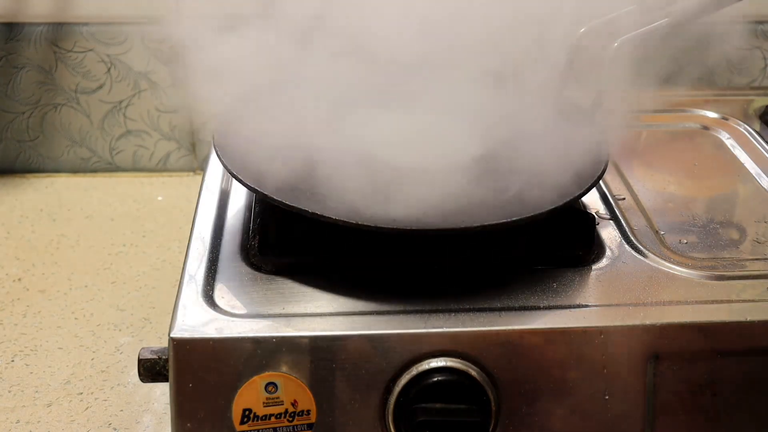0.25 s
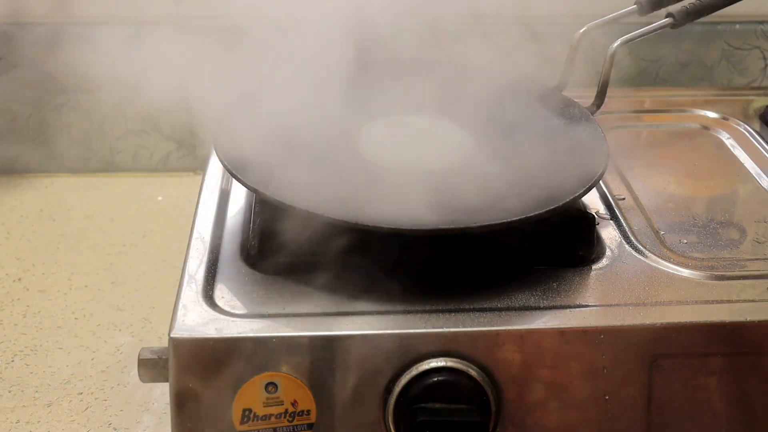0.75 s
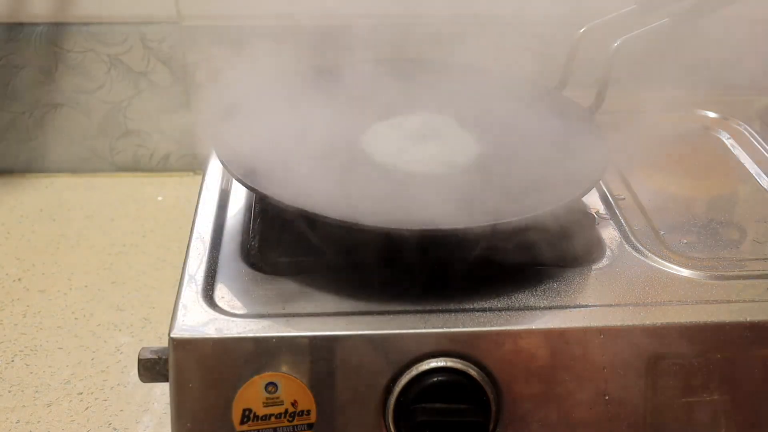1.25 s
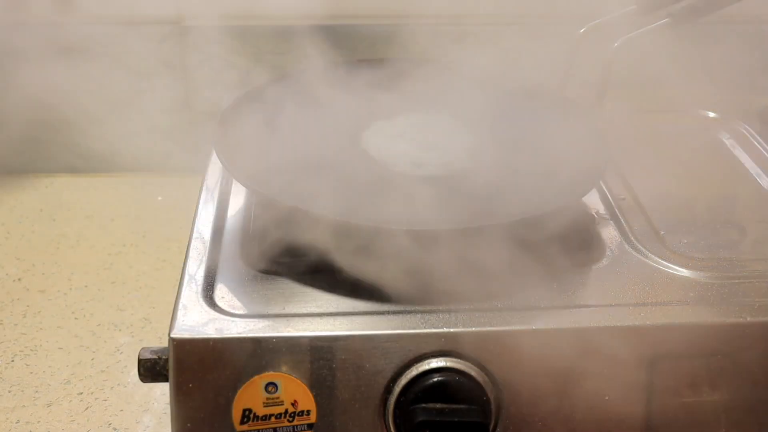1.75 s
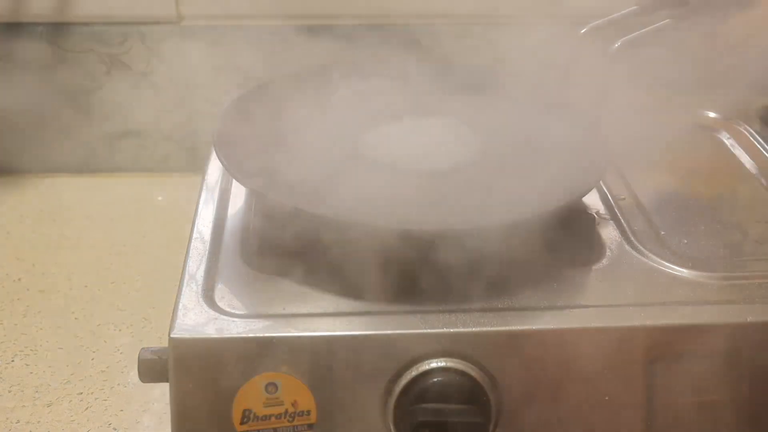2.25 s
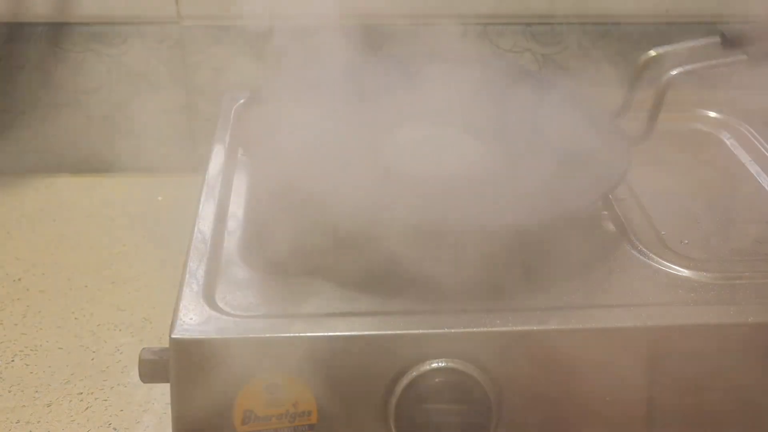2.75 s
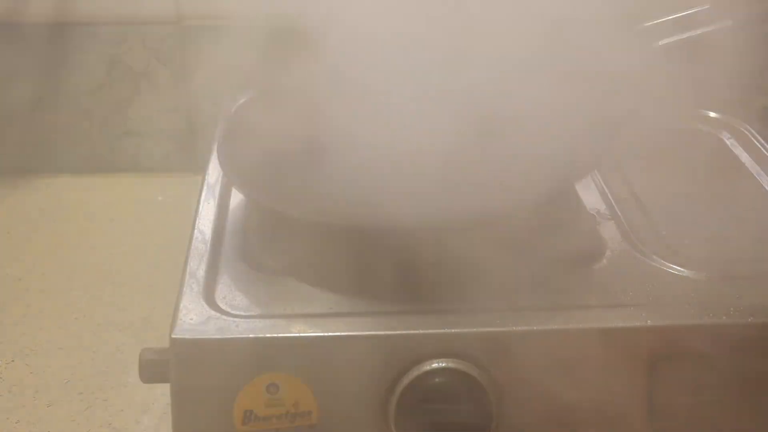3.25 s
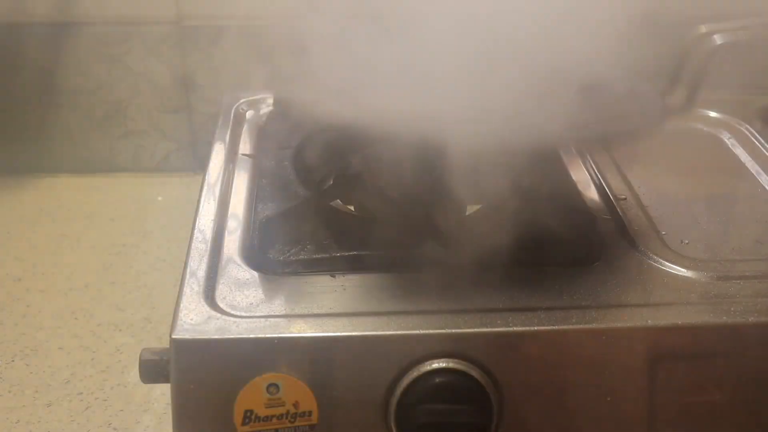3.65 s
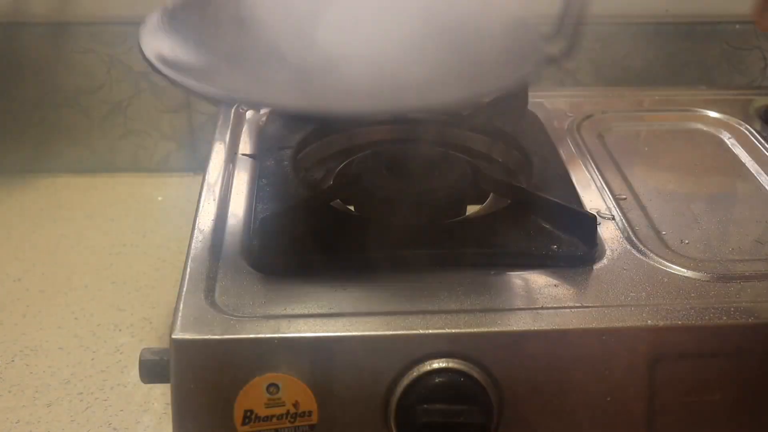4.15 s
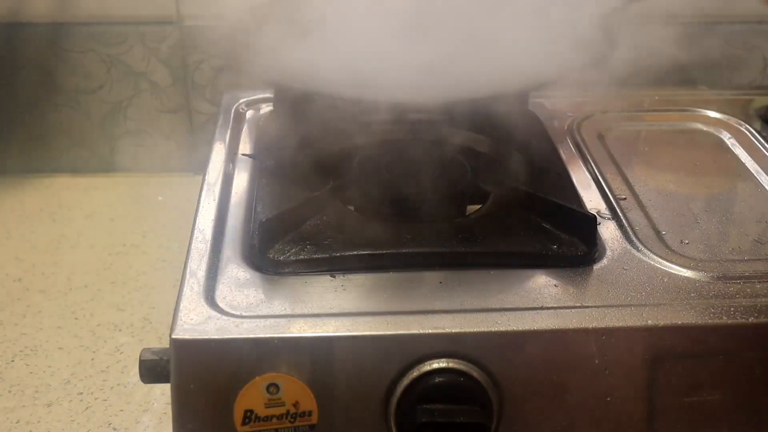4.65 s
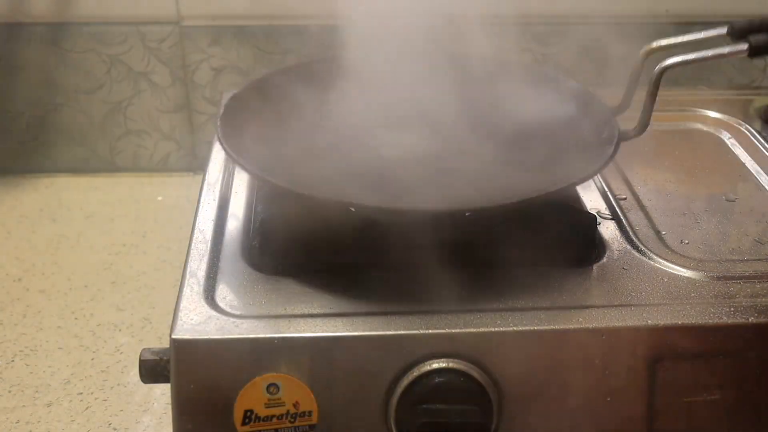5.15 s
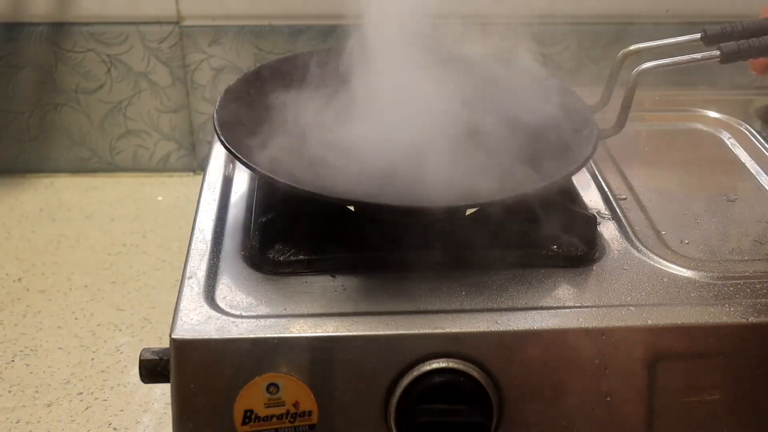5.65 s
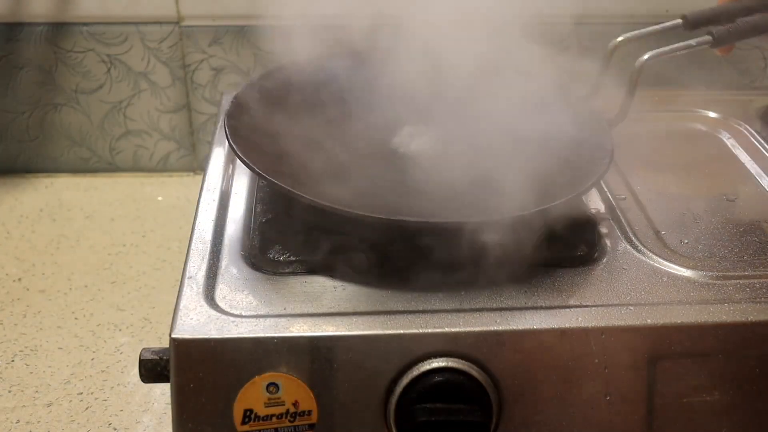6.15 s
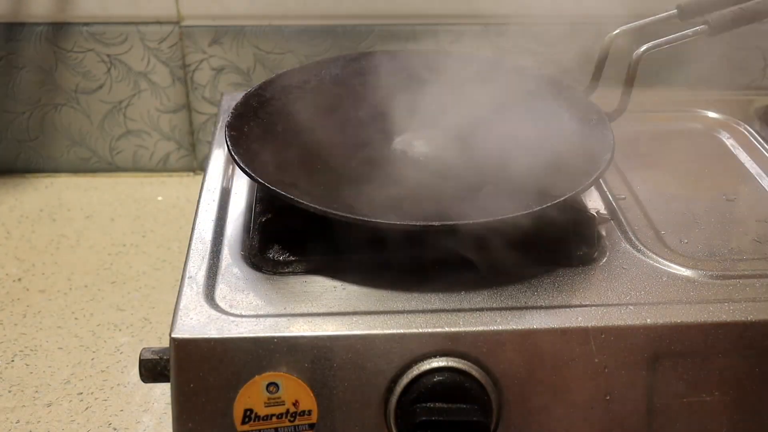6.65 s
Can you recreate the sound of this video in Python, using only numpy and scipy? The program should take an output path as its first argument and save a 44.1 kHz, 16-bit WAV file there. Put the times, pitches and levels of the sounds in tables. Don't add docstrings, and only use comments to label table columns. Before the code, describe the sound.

A strong sizzle is already under way: wide, treble-rich steam hiss, slightly stronger on the left, dusted with tiny bubble ticks. Loud bassless snaps spit from all over the hot plate, singly at first, then in thick volleys at about three and a half and five seconds as water runs over fresh hot iron. Afterwards the hiss drops and isolated crackles continue. Close stereo microphone, small tiled kitchen, short reflections.

```python
import sys
import numpy as np
from scipy import signal
from scipy.fft import rfft, irfft, next_fast_len
from scipy.io import wavfile
from scipy.ndimage import uniform_filter1d

SR = 44100
rng = np.random.default_rng(int(sys.argv[2]) if len(sys.argv) > 2 else 0)


def materialize(psi):
    bounded = np.clip(np.atleast_2d(psi).T, -1, 1)
    quanta = np.round(bounded * 32767).astype(np.int16)
    wavfile.write(sys.argv[1], SR, quanta)


def convert_level_to_amplitude(level_db):
    exponent = np.asarray(level_db, float) / 20
    return 10 ** exponent


N = 304290


def evened(x):
    return x / np.sqrt(np.mean(x ** 2) + 1e-20)


def read(points, hz):
    f, value = np.transpose(points)
    return np.interp(np.log(hz + 1), np.log(f + 1), value)


# t/s, steam hiss level/dB, small sputter level/dB, puddle position L-R level/dB
BOIL = [(0.0, -26, -33.5, -4.5), (0.25, -28, -35, -4.5), (0.45, -29, -40.5, -5.5), (1.2, -29.5, -36, -4),
        (1.55, -30, -40, -4.5), (2.05, -27.5, -41.5, -5.5), (2.42, -27.5, -41, -5), (2.75, -27, -40, -6),
        (3.33, -28.5, -44, -6), (3.55, -24.5, -34, -3), (4.08, -29.5, -45, -6), (4.35, -23.5, -37, -3),
        (4.75, -29.5, -40, -4.5), (5.15, -25.5, -33.5, -3.5), (5.5, -29.5, -34.5, -2),
        (5.8, -32, -38.5, -6), (6.3, -32, -40, -6), (6.9, -32, -38.5, -4)]


def boil(t, axis):
    curve = np.array(BOIL)
    return np.interp(t, curve[:, 0], curve[:, axis])


# f/Hz, density level/dB per Hz
HISS = [(60, -46), (150, -38), (400, -14), (1000, -6.5), (2000, -4.5), (3400, -2), (6000, -2.5),
        (10200, -2.5), (11900, 0), (13800, 1.5), (15600, -2.5)]
# f/Hz, L-R level/dB
LEAN = [(60, -2), (380, 4.5), (2380, 0), (15000, -6)]
# f/Hz, left-right coherence/1
SAME = [(60, 1), (1000, 0.44), (15000, 0.063)]


def steam(patchy_db=0.5, flicker_db=0.54, knee_hz=6000, lean_db=-4.0, lower_per_sputter=0.098):
    frames, hz = N // 64 + 5, np.fft.rfftfreq(256, 1 / SR)
    t = np.arange(frames) * 64 / SR
    a, b, c, d, patches = rng.standard_normal((frames, 129, 5)).T

    patches = uniform_filter1d(patches, size=12, axis=0)
    patches = evened(uniform_filter1d(patches, size=40, axis=1))
    flicker = evened(uniform_filter1d(rng.standard_normal(frames), size=14))

    same = np.clip(read(SAME, hz), -1, 1)[:, None]
    left = a + 1j * b
    right = same * left + np.sqrt(1 - same ** 2) * (c + 1j * d)
    z = np.array([left, right])

    sputter_db = boil(t, axis=2)
    low_band = 1 / (1 + (hz[:, None] / knee_hz) ** 4)
    lower_db = lower_per_sputter * (sputter_db - sputter_db.mean()) * low_band
    side_db = read(LEAN, hz)[:, None] + boil(t, axis=3) - lean_db
    z *= convert_level_to_amplitude(boil(t, axis=1) + lower_db + patchy_db * patches + flicker_db * flicker)
    z *= convert_level_to_amplitude(np.array([side_db, -side_db]) / 2)
    hiss = signal.istft(z, nperseg=256, noverlap=192)[1][:, :N]

    size = 2 * next_fast_len(N // 2 + 1)
    colour = convert_level_to_amplitude(read(HISS, np.fft.rfftfreq(size, 1 / SR)))
    return convert_level_to_amplitude(-12.5) * irfft(rfft(hiss, size) * colour)[:, :N]


def fizz(per_s=1200, level_db=-6.5):
    place, pitch, size = rng.random((int(per_s * N / SR) * 2, 3)).T
    t = np.arange(60) / SR
    hz = 3000 + 12000 * pitch[:, None]
    size_db = -4.0 * np.maximum(np.log(size), -5.0)
    rings = convert_level_to_amplitude(size_db)[:, None] * np.sin(2 * np.pi * hz * t) * np.exp(-t * hz / 2.0)
    at = (place * (2 * N - 60)).astype(int)[:, None] + np.arange(60)
    out = np.bincount(at.ravel(), rings.ravel(), minlength=2 * N).reshape(2, N)
    out = signal.lfilter(*signal.butter(3, 1500 / (SR / 2), "high"), out)
    s = np.arange(N) / SR
    side_db = np.outer([.5, -.5], boil(s, axis=3))
    return evened(out) * convert_level_to_amplitude(level_db + boil(s, axis=1) + side_db)


def bursts(s, db, side_db, width_ms, recoil=0.14, lag=8e-5, tick=0.62, bend_hz=140,
           large_db=-10, rise_share=.6):
    collapse_chance = np.where(db > large_db, .9, .65)
    sign = np.where(rng.random(len(s)) < collapse_chance, -1., 1.)
    direct, bent = np.zeros((2, N + 120)), np.zeros((2, N + 120))
    reach = np.arange(-50, 70)
    for port, away_db in enumerate([np.maximum(-side_db, 0), np.maximum(side_db, 0)]):
        shaded = np.tanh(away_db / 3.7)[:, None]
        at = (s[:, None] + lag * shaded) * SR
        place = np.clip(at.astype(int), 50, N) + reach
        ms = (place - at) / SR * 1000
        u = ms / width_ms[:, None] / np.where(ms < 0, rise_share, 1.2)
        snap = tick * np.sqrt(10 * width_ms)[:, None]
        spike = (1 - recoil * u ** 2) * np.exp(-u ** 2 / 2) + snap * np.exp(-(ms / 0.041) ** 2)
        spike *= (sign * convert_level_to_amplitude(db - away_db))[:, None]
        straight = spike * (1 - 0.55 * shaded)
        direct[port] = np.bincount(place.ravel(), straight.ravel(), minlength=N + 120)
        bent[port] = np.bincount(place.ravel(), (spike * shaded).ravel(), minlength=N + 120)
    round_housing = signal.lfilter(*signal.butter(1, bend_hz / (SR / 2)), bent)
    return (direct + 2.6 * round_housing)[:, :N]


def sputter(quiet_db=-42.5, loud_db=-30.0, per_s=420, spread_db=6, clump_db=2.2, clumps_per_s=14):
    when, size, rim, place, wide = rng.random((int(per_s * N / SR), 5)).T
    s = when * N / SR
    depth = np.clip((boil(s, axis=2) - quiet_db) / (loud_db - quiet_db), 0, 1)
    knots = rng.standard_normal(200)
    clump = clump_db * np.interp(s * clumps_per_s, np.arange(200), knots)
    db = clump + boil(s, axis=2) + 9.0 - spread_db * np.maximum(np.log(size), -2.5)
    side_db = np.sign(rim - .5) * (3.2 + 9.4 * place)
    width_ms = 0.033 + (0.05 + 0.23 * depth) * wide
    return bursts(s, db, side_db, width_ms, recoil=(.95 - 0.68 * depth)[:, None])


# start t/s, length t/s, rate/(pops per s), peak level/dB, width t/ms
VOLLEYS = [(0.032, 0.098, 60, -14, 0.11), (0.175, 0.02, 77, -10, 0.12), (0.236, 0.075, 110, -8, 0.12),
           (1.029, 0.12, 30.7, -14.5, 0.11), (1.15, 0.15, 70, -11, 0.09), (1.345, 0.085, 60, -10, 0.084),
           (0.385, 0.07, 40, -18, 0.09), (4.658, 0.025, 120, -8.5, 0.053), (4.865, 0.04, 40, -13, 0.093),
           (3.41, 0.08, 50, -7, 0.15), (3.508, 0.036, 260, -6, 0.19), (3.57, 0.035, 132, -6, 0.12),
           (3.621, 0.11, 44, -14, 0.12), (4.29, 0.16, 45, -13, 0.1), (4.922, 0.03, 138, -6.5, 0.12),
           (5.066, 0.06, 150, -7, 0.12), (5.148, 0.07, 110, -5.5, 0.11), (5.239, 0.065, 157, -3.5, 0.09),
           (5.358, 0.075, 62, -7.5, 0.088), (5.467, 0.06, 90, -7.5, 0.099), (5.56, 0.06, 92, -8, 0.11),
           (6.209, 0.19, 60, -13, 0.081), (6.52, 0.22, 40, -12, 0.072)]


def volleys(count=60, even=.35, spread_db=7, rim_db=0.5, rim_spread_db=17, width_spread=1):
    rows = []
    for start, length, per_s, db, width_ms in VOLLEYS:
        gap, size, rim, place, wide = rng.random((count, 5)).T
        gap = (even - (1 - even) * np.log(gap)) / per_s
        s = start + np.cumsum(gap) - gap[0]
        pop_db = db + spread_db * (.5 - size) - 3
        side_db = np.sign(rim - .5) * (rim_db + rim_spread_db * place)
        pop_ms = width_ms * np.exp(width_spread * (wide - .5))
        pops = np.transpose([s, pop_db, side_db, pop_ms])
        rows.append(pops[s < start + length])
    return np.concatenate(rows)


# t/s, peak level/dB, position L-R level/dB, spike width t/ms
POPS = [(0.373, -9, -5, 0.15), (0.4813, -10, -4.5, 0.13), (0.509, -3, -1.5, 0.12),
        (0.533, -4, -6, 0.15), (0.5495, -11, 1.5, 0.12), (0.601, -15.5, 0, 0.15),
        (0.6629, -9, 7, 0.093), (0.702, -13, -2, 0.15), (0.7176, -10, 3, 0.12),
        (0.7435, -8, -5, 0.09), (0.7503, -8, -3, 0.16), (0.8108, -3.5, -11, 0.089),
        (0.8264, -14, 0, 0.13), (0.8463, -5, -6, 0.11), (0.866, -5, 19, 0.13),
        (0.8768, -5, -11, 0.09), (0.9019, -9.5, -0.5, 0.12), (0.9157, -10, -1.5, 0.12),
        (0.987, -10.5, 5, 0.08), (1.0012, -5.5, -3.5, 0.097), (1.0071, -11, -11, 0.11),
        (1.0214, -3.5, -3, 0.16), (1.1277, -8, -4, 0.17), (1.178, -3.5, -4.5, 0.095),
        (1.1941, -10, 12, 0.13), (1.259, -9, 1, 0.1), (1.2999, -7, -6, 0.16), (1.44, -6.5, 8, 0.13),
        (1.4439, -6.5, -18, 0.075), (1.4862, -5.5, -4, 0.1),
        (1.6961, -8, -1.5, 0.13), (2.0106, -1.5, -5.5, 0.15), (2.0607, -7.5, -2.5, 0.099),
                  (2.0841, -5, -3.5, 0.2), (2.117, -4.5, -5, 0.17), (2.1725, -9, -6, 0.12),
                  (2.2009, -9, -6, 0.12), (2.4556, -6.5, 11, 0.1), (2.465, -0.5, -5, 0.14),
                  (2.4915, -7, 5, 0.11), (2.5006, -4, -8, 0.076), (2.5271, -10.5, 7, 0.13),
                  (2.576, -9, -2.5, 0.098), (2.8106, -8, -7, 0.22), (2.8325, -14, -7, 0.24),
                  (4.03, -12.5, 5, 0.088), (4.129, -7.5, 6, 0.069), (4.251, -10, -6, 0.13),
                  (4.2701, -4, 1.5, 0.087), (4.2791, -6, -10, 0.13), (4.2833, -3, 4, 0.15),
                  (4.322, -1.5, 9, 0.08), (4.364, -6, 16, 0.075), (4.4216, -11, -7, 0.2),
                  (4.4636, -6, -3, 0.12), (4.475, -3, -5, 0.14), (4.5252, -0.5, -6, 0.18),
                  (4.5978, -12, 6, 0.22), (4.7009, -4, -4, 0.13),
        (5.6683, -8.5, -4, 0.17), (5.7069, -12, -3, 0.13), (5.718, -7.5, -2.5, 0.12),
               (5.7471, -3, -6, 0.13), (5.7716, -7, -4, 0.09), (5.9214, -6, 1.5, 0.15),
               (5.9278, -4, -16, 0.054), (5.944, -13, -1, 0.12), (5.965, -6.5, -3.5, 0.11),
               (6.0005, -8, -3, 0.13), (6.0494, -6, -3, 0.15), (6.0591, -9, 9, 0.082),
               (6.0995, -12, 2, 0.17), (6.1645, -15, 4, 0.12), (6.2065, -7.5, -3.5, 0.1),
               (6.228, -9.5, -4, 0.11), (6.2641, -13, -3, 0.11), (6.2851, -7.5, -0.5, 0.13),
               (6.4349, -12.5, 6, 0.089), (6.4938, -9.5, 3, 0.09), (6.5228, -7.5, -2.5, 0.091),
               (6.5767, -3, -1.5, 0.065), (6.6027, -9.5, -3, 0.1), (6.6755, -5, -0.5, 0.14),
               (6.7068, -7.5, 9, 0.085), (6.7578, -8, 2, 0.1), (6.764, -13.5, -1, 0.11),
               (6.8076, -10, -5, 0.09), (6.8132, -11, 12, 0.11), (6.8314, -8.5, -4, 0.14),
        (0.064, -7, 4, 0.081), (0.2035, -8, -1, 0.11), (0.2142, -9, -6, 0.14),
                (0.243, -9, 7, 0.069), (0.265, -7, 12, 0.081), (3.4006, -7, 10, 0.39),
                (3.4306, -5.5, -2, 0.3), (3.4462, -4.5, 10, 0.087), (3.4664, -10.5, 8, 0.33),
                (3.4975, -4.5, 14, 0.12), (3.5514, -3, 15, 0.085), (3.5775, -3.5, -16, 0.22),
                (3.6297, -1.5, 15, 0.16), (3.656, -9.5, 13, 0.33), (3.6818, -3, 19, 0.071),
                (3.7078, -5, -9, 0.1), (4.956, -3, 17, 0.12), (4.9708, -4.5, -11, 0.15),
                (5.0276, -8.5, 6, 0.19), (5.046, -11, -6, 0.2), (5.0733, -2, 15, 0.047),
                (5.1285, -2, -8, 0.11), (5.1569, -2.5, 2.5, 0.12), (5.186, -2.5, -9, 0.13),
                (5.2265, -1, -6, 0.13), (5.236, -3, 7, 0.11), (5.3154, -5, -8, 0.076),
                (5.365, -7, -4, 0.15), (5.4125, -8, -10, 0.083), (5.476, -7.5, 1, 0.12)]


def single_pops():
    return np.array(POPS)


def rebounds(s, db, side_db, width_ms):
    wait, loss, shift = rng.random((len(s), 3)).T
    later = s + 0.0006 + 0.0018 * wait ** 2
    weaker_db = db - 5.0 - 18.0 * loss
    return -bursts(later, weaker_db, side_db * (1 + 1.5 * shift), 0.6 * width_ms)


def kitchen(x, t60=0.11):
    taps = np.zeros((2, 8000))
    at = np.arange(60, 7980, 20) + rng.integers(0, 20, (2, 396))
    np.put_along_axis(taps, at, rng.choice([-1., 1.], at.shape), axis=1)
    taps *= convert_level_to_amplitude(-60 * np.arange(8000) / SR / t60)
    return signal.oaconvolve(x, taps / np.linalg.norm(taps[0]), axes=1)[:, :N]


def scene():
    clear = np.concatenate([single_pops(), volleys()]).T
    pops = bursts(*clear) + rebounds(*clear) + sputter()
    vented = signal.lfilter(*signal.butter(1, 420 / (SR / 2), "high"), pops)
    return vented + convert_level_to_amplitude(-8.5) * kitchen(vented) + steam() + fizz()


def band_limit(x):
    return signal.sosfilt(signal.butter(12, 17030, fs=SR, output="sos"), x)


def record(dry):
    heard = signal.lfilter(*signal.butter(2, 150 / (SR / 2), "high"), dry)
    peak_db = 20 * np.log10(abs(heard).max(0) + 1e-9)
    fall = np.arange(N) * 60. / SR
    held_db = np.maximum.accumulate(peak_db + fall) - fall
    over_db = np.maximum(held_db + 2.5, 0)
    ducked = heard / convert_level_to_amplitude(0.44 * uniform_filter1d(over_db, size=60))
    rounded = 1.1 * np.tanh(ducked / 1.1)
    band = signal.firwin(511, 15750, window=("kaiser", 9), fs=SR)
    limited = signal.oaconvolve(rounded, band[None], "same")
    return band_limit(limited)


dry = scene()
out = record(dry)
materialize(out)
```